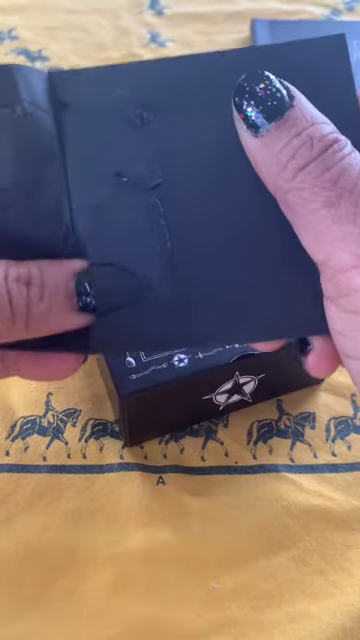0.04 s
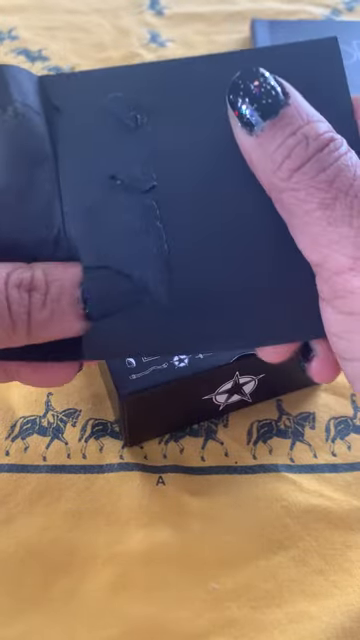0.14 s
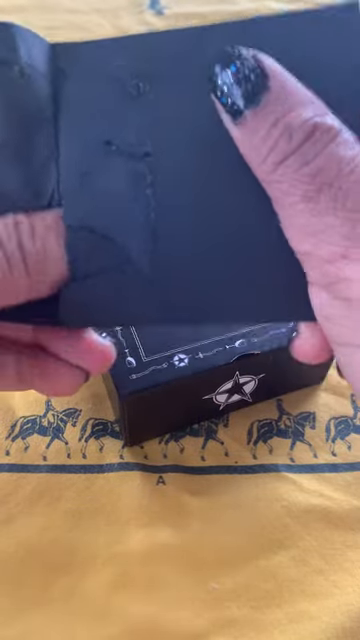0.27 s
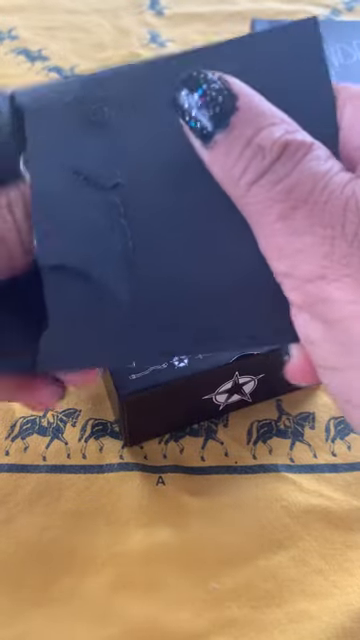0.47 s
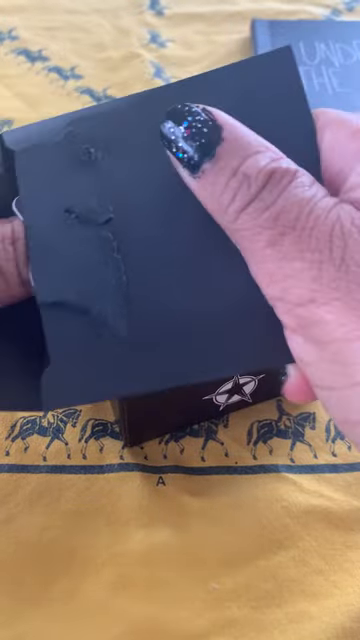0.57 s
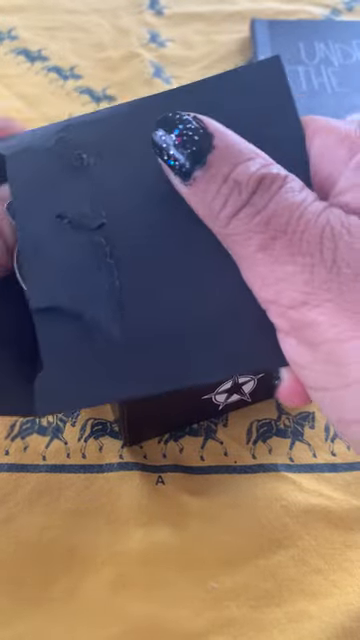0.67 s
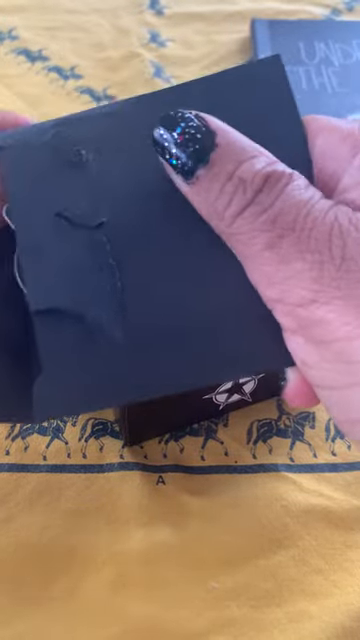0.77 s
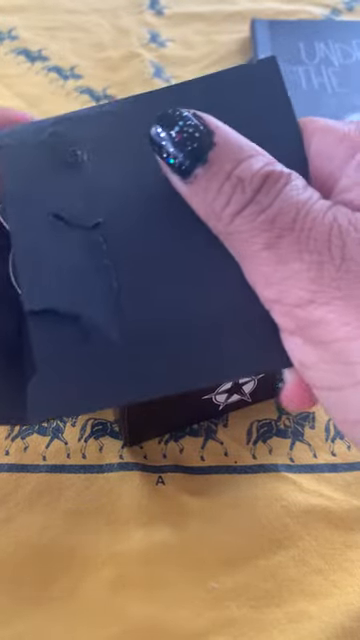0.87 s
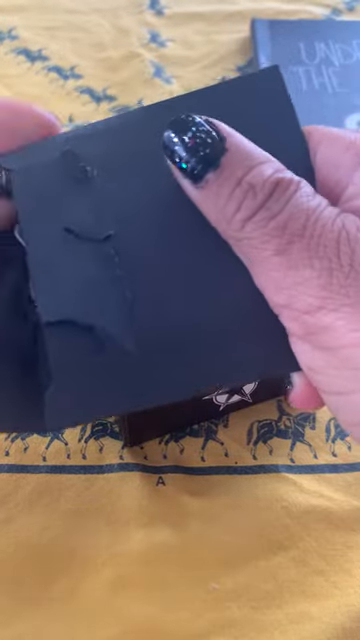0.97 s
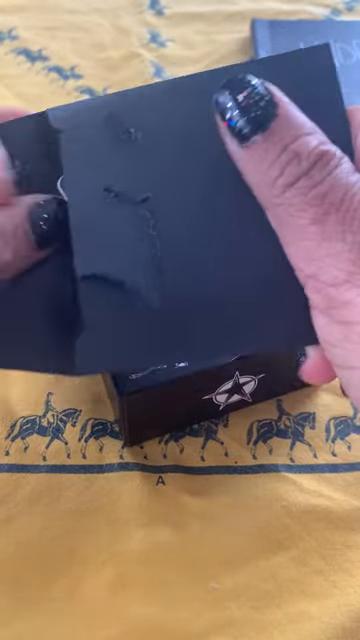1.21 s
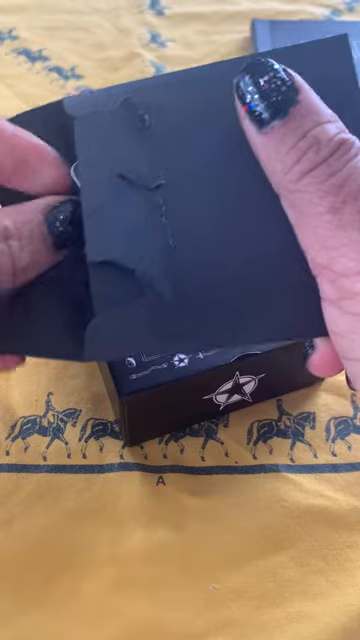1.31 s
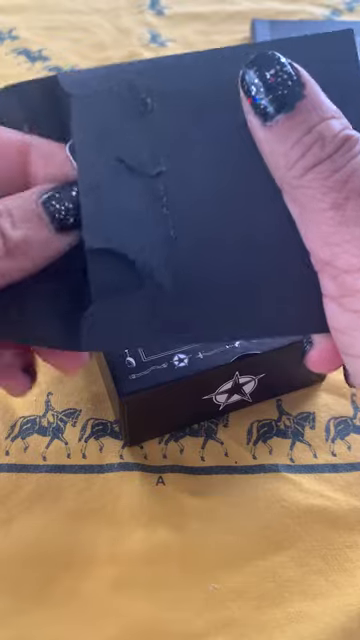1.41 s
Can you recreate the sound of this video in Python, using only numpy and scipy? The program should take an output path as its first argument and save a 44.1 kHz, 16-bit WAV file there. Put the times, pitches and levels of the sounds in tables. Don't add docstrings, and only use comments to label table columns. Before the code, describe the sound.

Stiff paper is handled and torn very close to a phone microphone. Soft finger rubbing opens, then crackles from 0.2 seconds build into a dense, loud rip at 0.36-0.42, with low flaps. Sparse snaps follow near 0.5, a second crackling burst at 0.67-0.77, a small snap at 0.93, and a light one around 1.36. Faint friction and low room hush continue in a dry, small room.

```python
import sys
import numpy as np
from scipy import signal
from scipy.fft import rfft, irfft, next_fast_len
from scipy.io import wavfile
from scipy.ndimage import uniform_filter1d, map_coordinates

SR = 44100
rng = np.random.default_rng(int(sys.argv[2]) if len(sys.argv) > 2 else 0)


def dump(signal):
    limited = np.clip(np.atleast_2d(signal).T, -1, 1)
    pcm = np.round(limited * 32767).astype(np.int16)
    wavfile.write(sys.argv[1], SR, pcm)


def convert_level_to_amplitude(level_db):
    exponent = np.asarray(level_db, float) / 20
    return 10 ** exponent


N = 63945

# start_s, level_db, bright_hz, sheet_db, sheet_hz
PAPER_SNAPS = [(0.2166, -28, 5680, -15, 1300), (0.2454, -15.5, 3100, -1.5, 1285),
               (0.2472, -12.5, 5800, 0, 1350), (0.2597, -20, 10100, -7, 1050),
               (0.2813, -24, 11630, -3, 1040), (0.2855, -26, 14300, -1, 1070),
               (0.2899, -0.5, 9630, -13.5, 1240), (0.2927, -27.5, 9000, 11.5, 1900),
               (0.2963, -25, 11110, -11, 443), (0.3187, -35, 2490, 17.5, 1940),
               (0.3232, -1.5, 9100, -8.5, 1840), (0.3351, -13.5, 10900, -11, 930),
               (0.3427, -30, 2480, 13, 1430), (0.4248, -10, 9650, -10.5, 1016),
               (0.4921, -19.5, 9050, -0.5, 974), (0.5071, -18.5, 9100, -4.5, 2060),
               (0.3636, 1.5, 9800, -12.5, 1344), (.3641, -15.5, 12500, 3, 934),
              (0.3671, -3.5, 5580, -12.5, 1140), (0.372, -2, 4440, -23, 597), (.373, 1, 10570, -24, 710),
              (0.377, -2.5, 9650, -10, 618), (0.3795, -19, 4500, -25, 690), (0.3825, -20, 4780, -35, 900),
              (0.3855, -2.5, 12300, -8.5, 2200), (0.3902, 0, 4120, -10.5, 1280),
              (0.3926, -10, 10000, -35, 1274), (0.394, -6, 9100, -3.5, 523),
              (0.3936, -3.5, 4120, -7.5, 854), (0.3972, 4, 2995, -9.5, 2095),
              (0.4002, -12.5, 3520, 0.5, 830), (0.404, -9.5, 4300, -6, 1080), (0.396, -18, 5960, -4, 1510),
              (0.4093, -9, 3320, 11.5, 1126), (.4152, -19, 8500, -1, 2020),
               (0.6655, -18, 8550, -22, 1570), (0.6692, -5, 6300, -11, 653), (0.6741, -7, 4740, -13.5, 1000),
              (0.6798, -6, 7300, -44, 2170), (0.6801, -12, 3470, -26, 930), (0.6818, -19.5, 7060, -11, 935),
              (0.6973, -9.5, 4300, -10.5, 2070), (0.7158, -19, 6670, -14, 1280),
              (0.7226, -9, 9050, -37, 2110), (0.7255, -5, 6730, -22, 1920), (0.7648, -12, 5800, -1.5, 1086),
              (0.7678, -6, 6360, -1.5, 2300), (0.7697, -4, 6020, -19, 2480), (0.7727, -7, 9500, -13.5, 654),
              (0.9263, -9.5, 7300, -5, 2070), (0.928, -18.5, 4200, -22, 2940),
              (1.3632, -21.5, 2150, -4, 920), (1.368, -13.5, 4130, -26, 2180)]
# start_s, length_s, level_db
RIP_RUNS = [(0.242, 0.012, -27.5), (0.29, 0.024, -58), (0.311, 0.0033, -41), (0.333, 0.011, -34),
            (0.361, 0.018, -27.5), (.363, .042, -26.5), (0.386, 0.018, -25.5), (0.401, 0.039, -32),
            (0.669, 0.02, -29.5), (0.733, 0.0042, -55), (0.758, 0.014, -39), (0.764, .013, -21),
            (0.77, 0.018, -59.5), (1.358, 0.019, -33), (0.902, 0.04, -44), (0.296, 0.014, -46),
            (0.732, 0.024, -51.5), (1.035, 0.21, -52.5)]
# start_s, level_db, pitch_hz, t60_s
SHEET_FLAPS = [(.291, -39.5, 295, 0.077), (.365, -25.5, 248, 0.013), (.396, -20.5, 255, 0.014),
               (.400, -27, 197, 0.053), (0.412, -26.5, 163, 0.03), (0.407, -33, 56, 0.1),
               (0.668, -54, 340, 0.044), (0.7683, -25, 171, 0.075), (0.7706, -26.5, 335, 0.045),
               (0.7715, -24, 60, 0.2), (.9283, -30, 800, 0.026), (0.9264, -25, 1400, .016),
               (.4097, -36, 1115, 0.018), (1.011, -35, 170, 0.045), (1.108, -35, 235, 0.025),
               (1.131, -35, 156, 0.03), (1.370, -35, 150, 0.052), (1.383, -33, 131, 0.04)]
# time_s, level_db
SLIDE_LEVEL = [(.04, -39.5), (.09, -46), (0.129, -38), (0.188, -46), (0.233, -33.5), (.275, -46.5),
               (.35, -44), (.44, -39.5), (0.508, -38), (0.566, -54), (0.631, -41.5), (.75, -45.5),
               (0.868, -61.5), (0.946, -39.5), (1.072, -41), (1.224, -50), (1.343, -37), (1.45, -41)]
# freq_hz, level_db
FIBRE_COLOUR = [(200, 0), (700, -8), (1500, -3), (4500, 4), (7000, 2), (11000, -3), (14000, -11),
                (16500, -14)]
# freq_hz, level_db
SKIN_COLOUR = [(150, -6), (400, -10), (1500, -2), (3000, -1), (6000, 1.5), (9000, -2.5), (13000, -4.5),
               (16500, -5)]
# freq_hz, t60_s
ROOM_DECAY = [(200, 0.19), (2000, 0.21), (10000, 0.017)]
# freq_hz, level_db
AIR_COLOUR = [(24, -52), (40, 11.5), (151, -1), (199, -23.5), (276, -5.5), (433, -15), (6650, -92),
              (16000, -63)]
# freq_hz, lead_rad
PORT_LEAD = [(0, -.15), (350, -.5), (900, -.55), (1500, -.3), (2070, .55), (2760, 1.4), (3700, 1.95),
             (4760, 3.14), (17000, 21.25)]
# freq_hz, difference_db
PORT_TILT = [(60, -1.5), (300, -1.5), (700, -2.3), (1400, -3.8), (2400, -5.5), (3400, -2), (4200, 0),
             (16000, 0)]


def unit(x):
    return x / np.sqrt(np.mean(x ** 2) + 1e-20)


def along(points, hz):
    point_hz, value = np.transpose(points)
    return np.interp(np.log(hz + 1), np.log(point_hz + 1), value)


def wobble(rate_hz):
    knots = rng.standard_normal(int(N * rate_hz / SR) + 4)
    return map_coordinates(knots, [np.arange(N) * rate_hz / SR])


def filtered(x, response):
    n = x.shape[-1]
    padded = next_fast_len(n + 4096)
    spectrum = rfft(x, padded) * response(np.fft.rfftfreq(padded, 1 / SR))
    return irfft(spectrum, padded)[..., :n]


def peak(f, hz, width_hz):
    return 1j * f * width_hz / (hz * hz - f * f + 1j * f * width_hz + 1e-9)


def grains(per_s, spread_db, clump_db):
    hit = rng.random(N) < per_s / SR
    size_db = np.minimum(spread_db * rng.exponential(size=N), 7)
    size_db = size_db + clump_db * wobble(600)
    return unit(hit * rng.choice([-1, 1], N) * convert_level_to_amplitude(size_db))


def patchy(x, patchy_db):
    z = signal.stft(x, nperseg=256)[2]
    field = uniform_filter1d(rng.standard_normal(z.shape), size=6, axis=0)
    field = uniform_filter1d(field, size=8, axis=1)
    return signal.istft(z * convert_level_to_amplitude(patchy_db * unit(field)), nperseg=256)[1][:N]


def snaps():
    snap_t60_s, rise_s, crack_db, crack_t60_s = 0.0054, 0.00031, 13, 0.0019
    ring_q, ring_db, sheet_q, sheet_wide_db = 3.5, 8.5, 3, -9
    snap_trim_db, sheet_trim_db, knock_s = -2.5, 0.5, 0.000083
    out = np.zeros(N + SR)
    t = np.arange(SR // 40) / SR
    knock = t / knock_s * np.exp(-t / knock_s)
    fade = convert_level_to_amplitude(-60 * t / snap_t60_s) + convert_level_to_amplitude(crack_db - 60 * t / crack_t60_s)

    for start_s, level_db, bright_hz, sheet_db, sheet_hz in PAPER_SNAPS:
        def bright_ring(f):
            wide = peak(f, bright_hz, 1.57 * bright_hz) ** 2
            return wide + convert_level_to_amplitude(ring_db) * peak(f, bright_hz, bright_hz / ring_q) ** 2

        def sheet_ring(f):
            mode = peak(f, sheet_hz, sheet_hz / sheet_q) ** 2
            return mode + convert_level_to_amplitude(sheet_wide_db) * peak(f, 1066, 2000) ** 2

        burst = rng.standard_normal(len(t)) * fade * (1 - np.exp(-t / rise_s))
        bright = filtered(burst, bright_ring)
        sheet = filtered(knock + 0.33 * burst, sheet_ring)
        snap = bright / np.abs(bright).max()
        snap = snap + convert_level_to_amplitude(sheet_db + sheet_trim_db) * sheet / np.abs(sheet).max() / 2
        out[round(start_s * SR):][:len(t)] += convert_level_to_amplitude(level_db + snap_trim_db) * snap
    return out[:N]


def rips():
    t = np.arange(N) / SR
    swell = np.zeros(N)
    for start_s, length_s, level_db in RIP_RUNS:
        progress = np.clip((t - start_s) / length_s, 0, 1)
        swell += convert_level_to_amplitude(level_db) * np.sin(np.pi * progress) ** 0.6
    breaks = grains(per_s=9000, spread_db=16, clump_db=3)
    return swell * unit(filtered(breaks, lambda f: convert_level_to_amplitude(along(FIBRE_COLOUR, f))))


def flaps():
    sag_hz, settle_s, swell_cycles = 97, 0.0025, 0.35
    out = np.zeros(N + SR)
    t = np.arange(SR // 4) / SR
    for start_s, level_db, pitch_hz, t60_s in SHEET_FLAPS:
        pitch = pitch_hz + sag_hz * np.exp(-t / settle_s)
        swing = np.cos(2 * np.pi * np.cumsum(pitch) / SR)
        swing = swing * (1 - np.exp(-t * pitch_hz / swell_cycles))
        out[round(start_s * SR):][:len(t)] -= convert_level_to_amplitude(level_db - 60 * t / t60_s) * swing
    return out[:N]


def fingers():
    level_db = np.interp(np.arange(N) / SR, *np.transpose(SLIDE_LEVEL))
    level_db = level_db + 1.92 * wobble(26.335) + 1.72 * wobble(90)
    rub = grains(per_s=9000, spread_db=-1, clump_db=2.4) + 0.96 * rng.standard_normal(N)
    skin = filtered(rub, lambda f: convert_level_to_amplitude(along(SKIN_COLOUR, f)))
    return convert_level_to_amplitude(level_db) * unit(patchy(skin, patchy_db=2.0))


def room(x):
    apart_db = -7
    out = np.zeros((2, N))
    for part in np.array_split(np.arange(N), 12):
        hz, t, z = signal.stft(rng.standard_normal((3, SR // 3)), SR, nperseg=256)
        decay = convert_level_to_amplitude(-60 * t / along(ROOM_DECAY, hz)[:, None])
        noise = signal.istft(z * decay, SR, nperseg=256)[1]
        tail = (noise[0] + convert_level_to_amplitude(apart_db) * noise[1:]) / np.linalg.norm(noise[0])
        wet = signal.fftconvolve(x[part][None], tail, axes=1)[:, :N - part[0]]
        out[:, part[0]:part[0] + wet.shape[1]] += wet
    return out


def air():
    noise = rng.standard_normal((3, N))
    hush = filtered(noise[0] + 0.23 * noise[1:], lambda f: convert_level_to_amplitude(along(AIR_COLOUR, f)))
    level_db = -51.5 + 0.7 * wobble(14.7)
    return convert_level_to_amplitude(level_db) * unit(hush)


def scene():
    room_db = -21
    paper = snaps() + rips() + flaps() + fingers()
    return paper + convert_level_to_amplitude(room_db) * room(paper) + air()


def low_pass(x):
    return signal.sosfilt(signal.butter(12, 16700, fs=SR, output="sos"), x)


def record(dry):
    low_cut_hz, top_hz, above_top_db = 48, 15800, -32
    ceiling, knee = 0.92, 5
    side = np.array([[.5], [-.5]])

    def ports(f):
        low_cut = (1j * f / (low_cut_hz + 1j * f)) ** 4
        high_cut = np.where(f < top_hz, 1, convert_level_to_amplitude(above_top_db))
        lag = np.exp(1j * side * np.interp(f, *np.transpose(PORT_LEAD)))
        return convert_level_to_amplitude(side * along(PORT_TILT, f)) * lag * low_cut * high_cut

    x = filtered(dry, ports)
    mix = x / (1 + np.abs(x / ceiling) ** knee) ** (1 / knee)
    return low_pass(mix)


dry = scene()
out = record(dry)
dump(out)
```